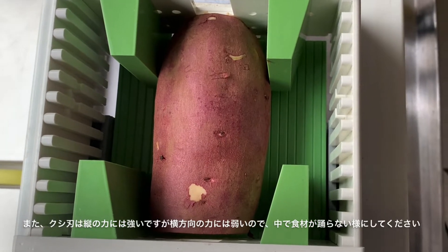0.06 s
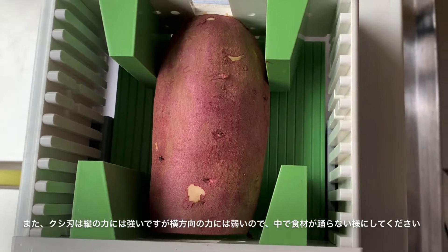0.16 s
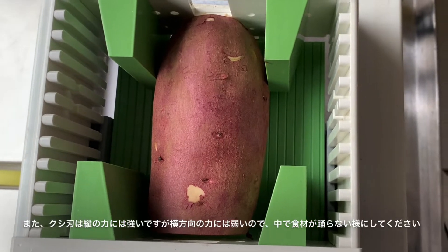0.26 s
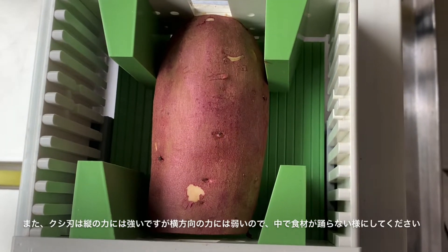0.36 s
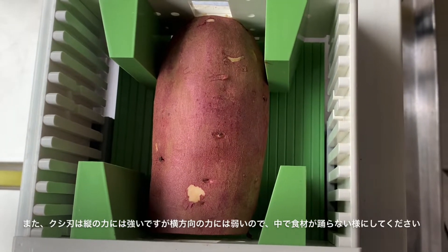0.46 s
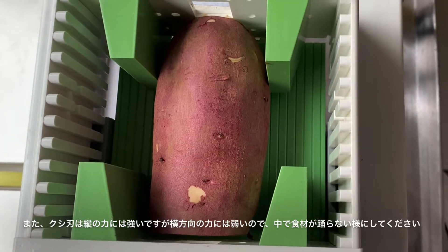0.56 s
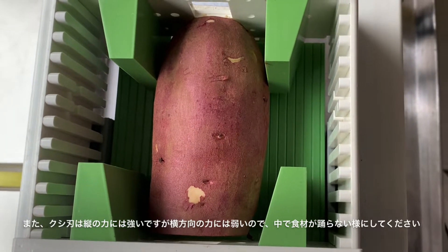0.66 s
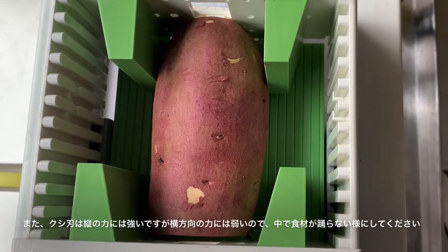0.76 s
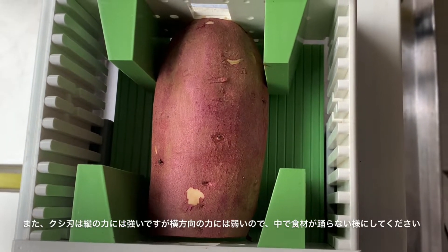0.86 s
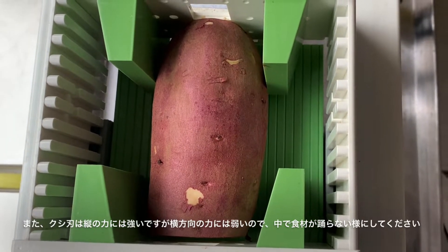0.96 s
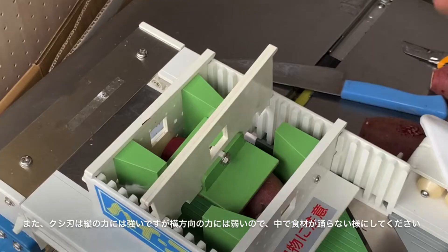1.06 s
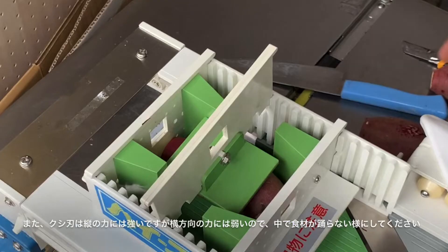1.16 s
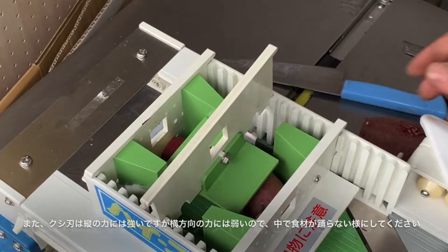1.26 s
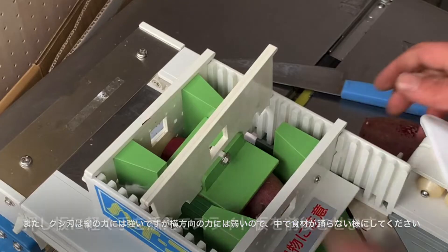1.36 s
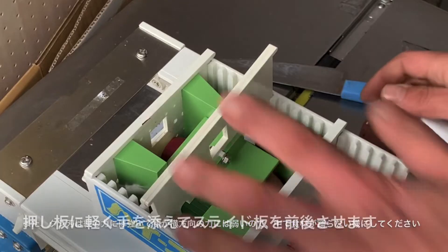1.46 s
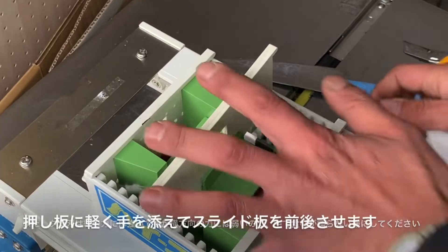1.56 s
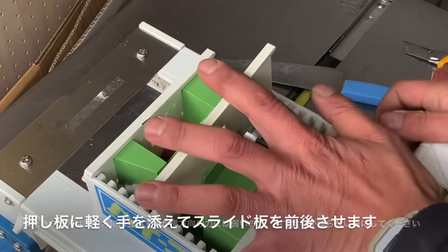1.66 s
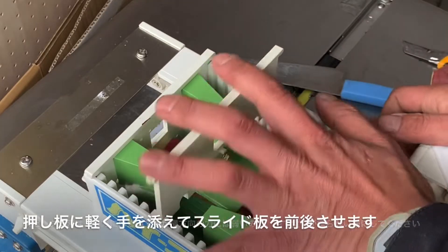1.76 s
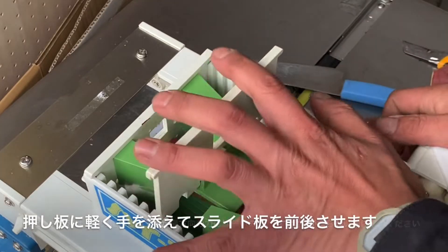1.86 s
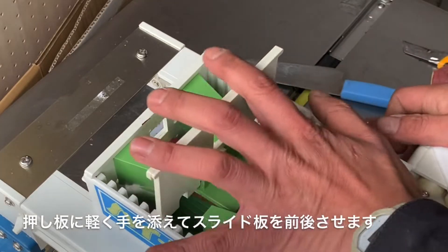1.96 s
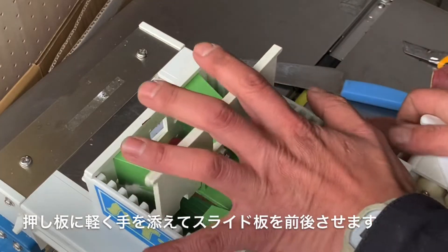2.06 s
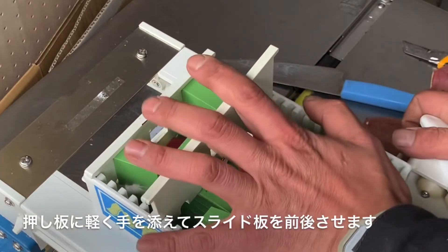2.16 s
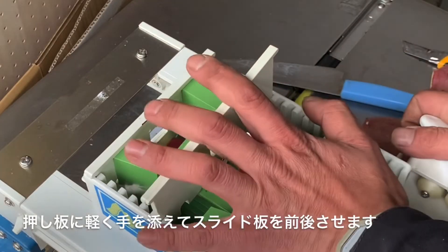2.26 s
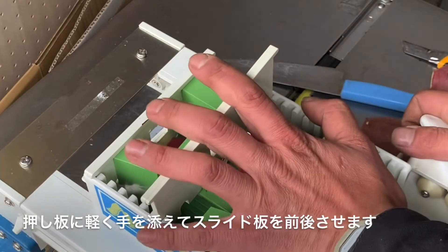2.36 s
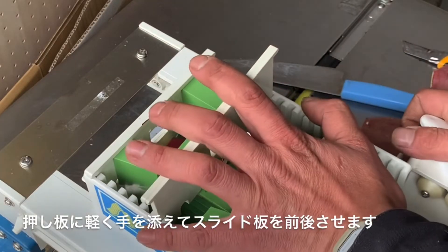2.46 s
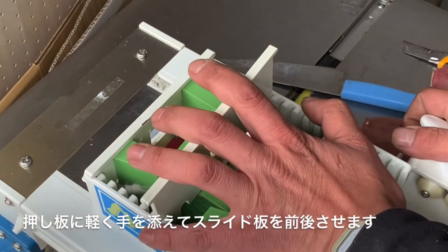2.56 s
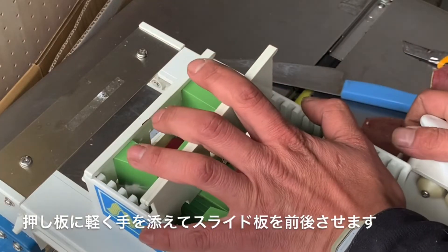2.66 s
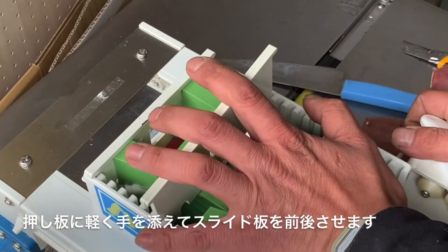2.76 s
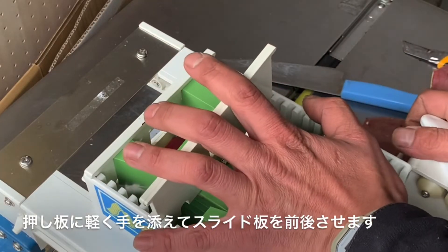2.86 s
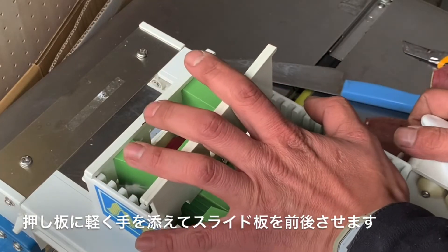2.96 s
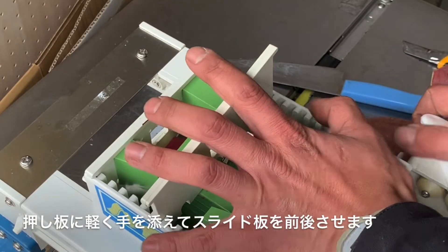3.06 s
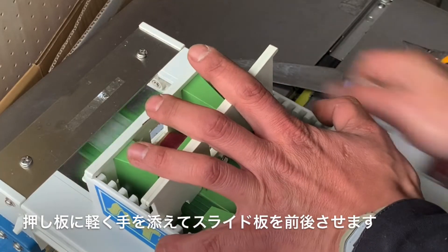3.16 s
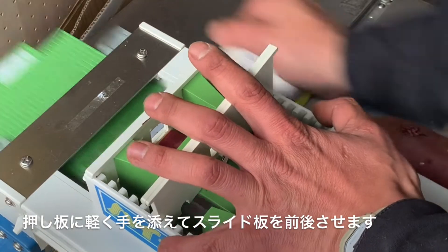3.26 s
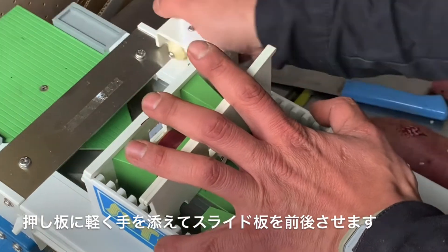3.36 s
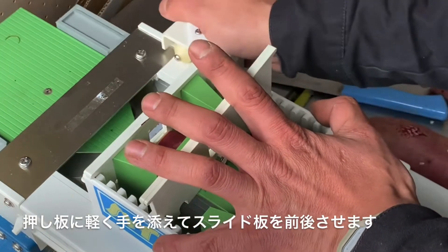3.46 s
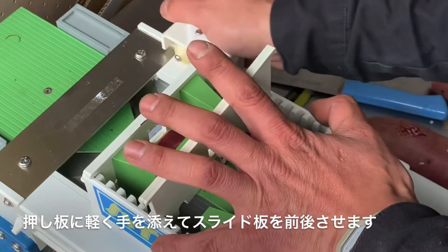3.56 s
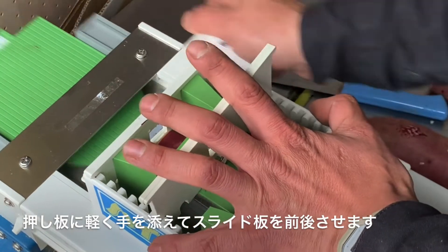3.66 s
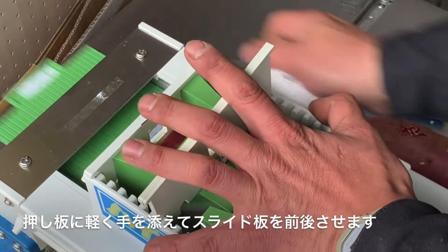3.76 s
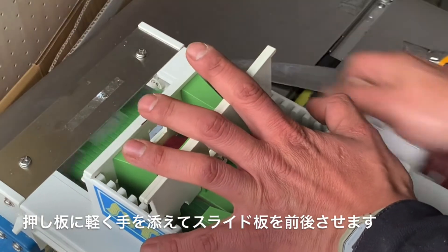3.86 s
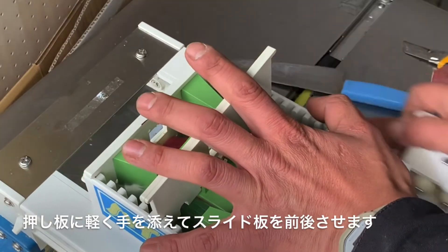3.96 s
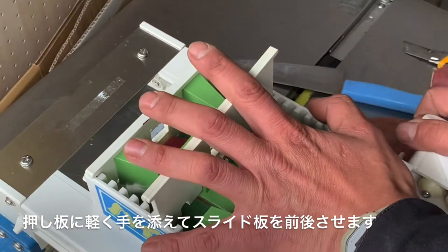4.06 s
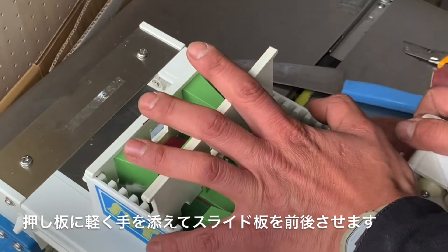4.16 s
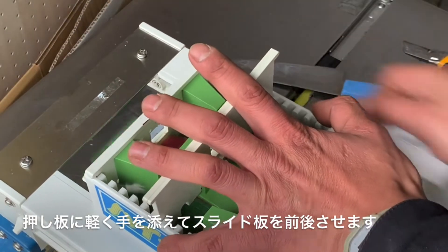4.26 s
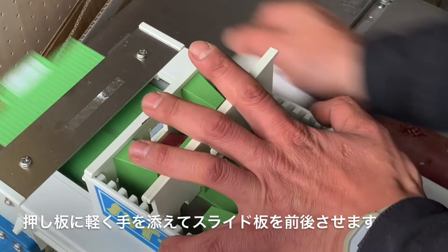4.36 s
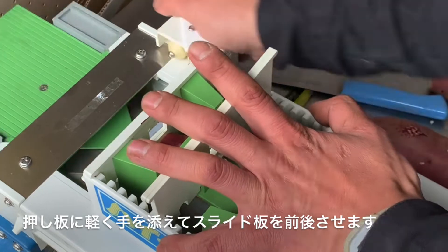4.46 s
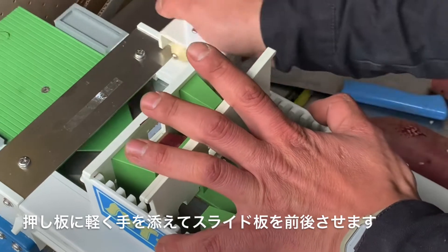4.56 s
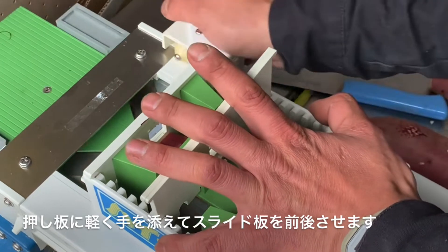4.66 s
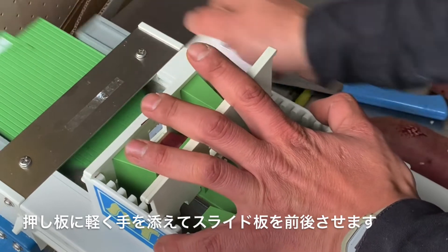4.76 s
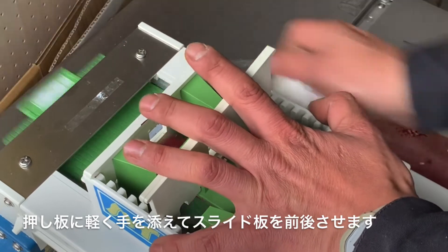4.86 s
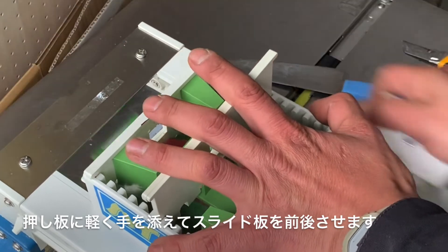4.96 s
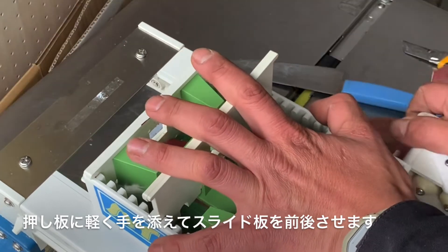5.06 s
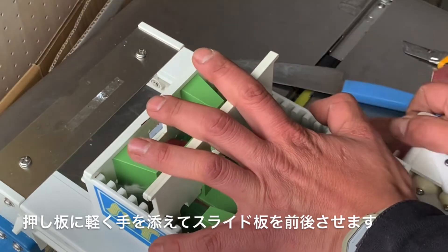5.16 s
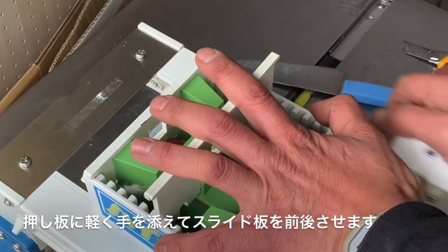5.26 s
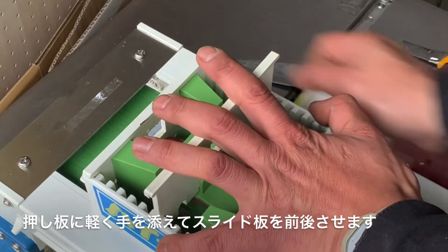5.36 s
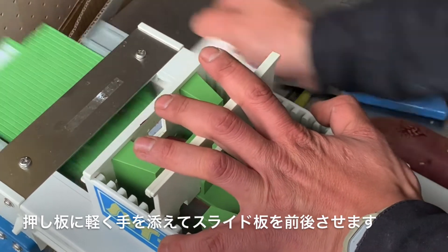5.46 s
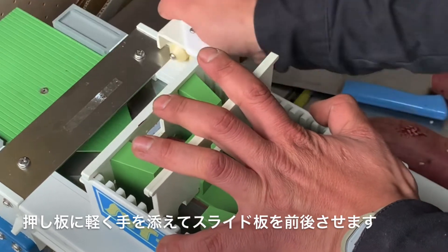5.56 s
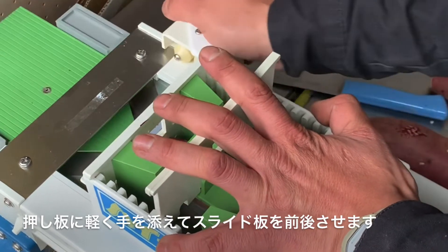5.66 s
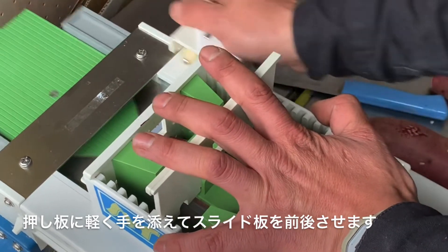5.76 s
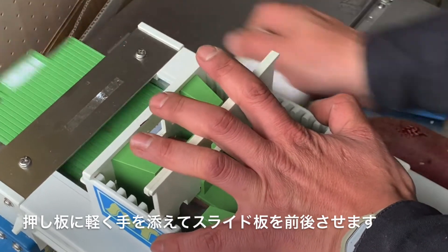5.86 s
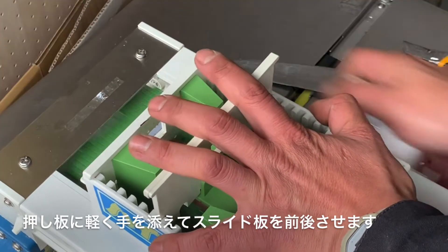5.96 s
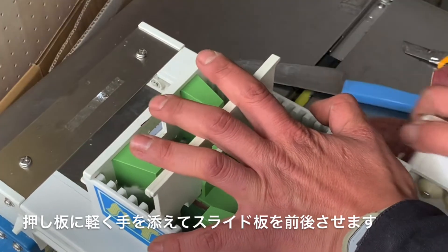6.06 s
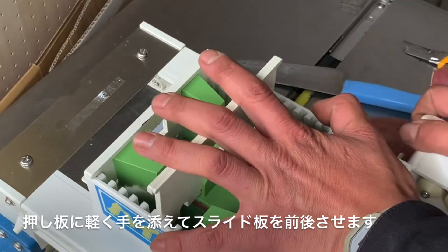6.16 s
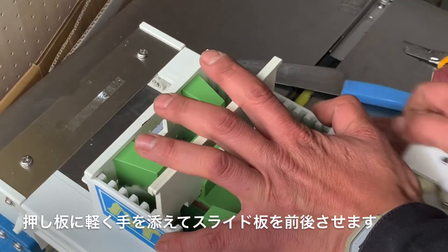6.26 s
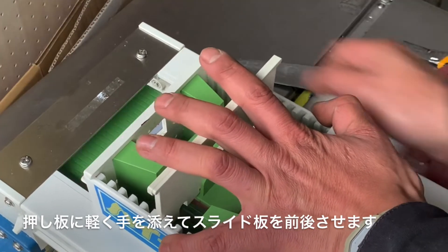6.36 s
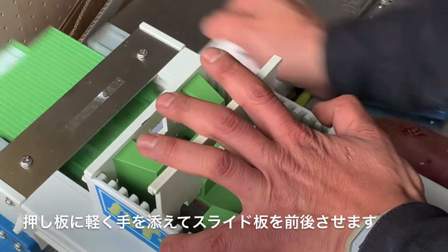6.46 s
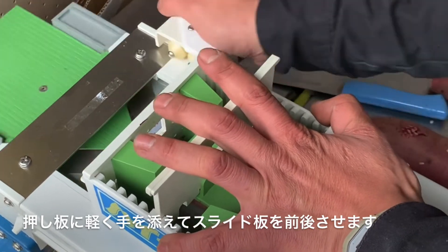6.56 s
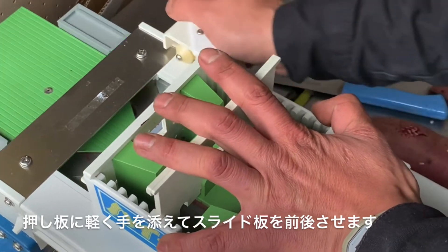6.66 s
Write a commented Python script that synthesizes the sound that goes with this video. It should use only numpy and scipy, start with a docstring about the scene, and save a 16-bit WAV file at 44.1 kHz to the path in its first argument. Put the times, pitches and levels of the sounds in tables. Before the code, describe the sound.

For the first second there is only a very quiet low fan rush with mains hum and a faint motor whine. At 1 s the level dips briefly and the fan steps up fuller; a barely audible thin tone climbs slowly. Between 1.1 and 2.1 s, soft brushing of skin and sleeve and small plastic taps mark fingers settling on a box, the clearest near 1.75-2.1 s. Little but the fan remains until two tiny dropouts just after 3 s. At about 3.1 s the first loud stroke rasps, with hard hollow clacks near 3.15 and 3.3 s. Strokes follow near 3.65, 4.2, 4.75, 5.25, 5.75 and 6.3 s, coarse and crunchy, with mid-pitched plastic rattles, brighter clicks and low counter shudder. Strong knocks land near 4.0, 4.43 and 6.5 s, as cutting continues to the end. Close, short room echo.

```python
"""A hand slicer on a kitchen counter. A fan hums, quieter in the first second, then stepping up quickly at
1 s; a faint tone climbs, and soft knocks and brushing noise tell of fingers settling on the plastic box.
From about 3 s the ribbed plate is pushed and pulled under a sweet potato: shaped noise scrapes and snaps,
low modes shake the counter, and decaying rattles knock at blade and stops. The level dips briefly at
about 1 s and twice near 3 s."""
import sys
import numpy as np
from scipy import signal
from scipy.fft import rfft, irfft, next_fast_len
from scipy.io import wavfile
from scipy.ndimage import uniform_filter1d

SR = 44100
rng = np.random.default_rng(int(sys.argv[2]) if len(sys.argv) > 2 else 0)


def int16_out(signal):
    """Quantize to a 16-bit WAV file."""
    q = np.round(np.clip(np.atleast_2d(signal).T, -1, 1) * 32767)
    wavfile.write(sys.argv[1], SR, q.astype(np.int16))


N = 296352
TIME = np.arange(N) / SR


def gain_of(db):
    """Decibels to amplitude."""
    return 10 ** (np.asarray(db) / 20)


def evened(x):
    """Scales to rms 1."""
    return x / np.sqrt(np.mean(x ** 2) + 1e-20)


def read(points, hz):
    """Reads a spectrum on a log-frequency axis."""
    point_hz, value = np.transpose(points)
    return np.interp(np.log(hz + 1), np.log(point_hz + 1), value)


def follow(rows, t):
    """Columns of a curve table at times t."""
    s, *columns = np.transpose(rows)
    return [np.interp(t, s, column) for column in columns]


def ring(x, hz, width_hz):
    """One resonance of gain near 1: a complex one-pole filter."""
    pole = np.exp((-np.pi * width_hz + 2j * np.pi * hz) / SR)
    return 2 * signal.lfilter([1 - abs(pole)], [1, -pole], x).real


def sliding(x, hz, width_hz):
    """A resonance that follows the curve hz: shift to 0 Hz, low-pass, shift back."""
    turn = np.exp(2j * np.pi * np.cumsum(hz) / SR)
    r = np.exp(-np.pi * width_hz / SR)
    return 2 * (turn * signal.lfilter([1 - r], [1, -r], x / turn)).real


def wander(width_hz):
    """Slow random curve of rms 1: noise low-passed twice."""
    return evened(ring(ring(rng.standard_normal(N), 0, width_hz), 0, width_hz))


def hiss(spectrum, size, patchy_db, tilt_db=0, bins=5):
    """Noise of a spectrum with drifting patches (rms patchy_db); tilt_db > 0 brightens, per frame."""
    hz = np.fft.rfftfreq(size, 1 / SR)
    frames = N * 4 // size + 5
    real, imag, patches = rng.standard_normal((frames, len(hz), 3)).T
    patches = uniform_filter1d(patches, size=20, axis=1)
    patches = evened(uniform_filter1d(patches, size=bins, axis=0))
    frame_tilt_db = np.interp(np.arange(frames) * size / 4, np.arange(N), tilt_db * np.ones(N))
    lean_db = frame_tilt_db * np.log2(hz / 2000 + 2.8)[:, None]
    level_db = read(spectrum, hz)[:, None] + patchy_db * patches + lean_db
    z = (real + 1j * imag) * gain_of(level_db)
    return signal.istft(z, nperseg=size, noverlap=size * 3 // 4)[1][:N]


def catches(per_s, spread_db, decay_s):
    """Uneven grip: random catches, each a sudden jump in force that dies away."""
    happens = rng.random(N) < per_s / SR
    jumps = gain_of(spread_db * np.minimum(rng.exponential(1, N), 4)) * happens
    return evened(signal.lfilter([1], [1, -np.exp(-1 / (decay_s * SR))], jumps))


# fan rush spectrum: [hz, level_db_per_hz]
AIR_SPECTRUM = [(25, -13), (55, 8), (82, -3.5), (125, -7.5), (155, -11.5), (210, -12), (300, -11),
                (600, -24.5), (1000, -31.5), (7300, -55.5), (16000, -56)]
# fan over time: [time_s, rush_db, motor_hz, whine_db]
FAN_CURVE = [(0, -61, 134, -68.5), (1.0, -63.5, 134.1, -70.5), (1.1, -55, 131.9, -67), (1.5, -54, 132, -60),
             (3.0, -52, 130.8, -63.5)]
# mains hum: [hz, peak_db re rush rms]
HUM_TONES = [(100, -3.5), (200, -12)]
# motor harmonics 1-5: [level_db re whine]
WHINE_HARMONICS_DB = [-4.5, -10.5, -1, -20, -26.5]
# faint climbing tone: [time_s, pitch_hz, level_db]
RISER_CURVE = [(1.2, 532, -97), (1.4, 547, -80), (2.45, 580, -72.5), (3.0, 591.6, -72.5)]


def fan():
    """Low rush with mains hum, and apart from it the motor's whine and a climbing tone."""
    rush_db, motor_hz, whine_db = follow(FAN_CURVE, TIME)
    waver_db = evened(ring(rng.standard_normal(N), 0, 24.0))
    motor_phase = 2 * np.pi * np.cumsum(motor_hz) / SR
    harmonics = sum(gain_of(db) * np.sin(k * motor_phase)
                    for k, db in enumerate(WHINE_HARMONICS_DB, 1))
    whine = gain_of(whine_db + 0.42 * waver_db) * harmonics
    riser_hz, riser_db = follow(RISER_CURVE, TIME)
    riser = gain_of(riser_db) * np.sin(2 * np.pi * np.cumsum(riser_hz) / SR)
    hum = sum(gain_of(db) * gain_of(waver_db) * np.sin(2 * np.pi * hz * TIME) for hz, db in HUM_TONES)
    air = evened(hiss(AIR_SPECTRUM, size=2048, patchy_db=2.5))
    return gain_of(rush_db) * (air + hum), np.sqrt(2) * (whine + riser)  # tone tables are rms


# blows on the box: [start_s, level_db, spot_hz, crack_db (relative), t60_s]
BLOWS = [(0.929, -60.5, 940, -32, 0.034), (1.63, -55, 186, -40, 0.24), (1.742, -40, 1550, -27, 0.052),
         (1.756, -45, 328, -30, 0.12), (1.798, -36.5, 3290, -19, 0.06), (2.02, -49.5, 1500, -10, 0.14),
         (2.091, -38.5, 3570, -26, 0.047), (2.108, -33.5, 984, -32, 0.057), (2.459, -53, 1070, -20, 0.15),
         (2.772, -60, 1750, -20, 0.064), (2.901, -47, 3870, -20, 0.16), (2.998, -32, 2030, -2, 0.064),
         (3.039, -37.5, 1060, -26, 0.14), (3.147, -12, 1452, -3.5, 0.084), (3.312, -13, 1910, -6.5, 0.082),
         (3.315, -8.5, 1083, -29, 0.057), (3.325, -27.5, 191, -40, 0.35), (3.444, -34.5, 2960, -4, 0.065),
         (3.547, -25, 1050, -39, 0.072), (3.67, -25, 4360, -2, 0.093), (3.928, -30.5, 4960, -4, 0.07),
         (3.959, -24.5, 4263, 1, 0.13), (3.974, -10, 1630, -7, 0.05), (4.166, -37, 1080, -2.5, 0.18),
         (4.243, -26.5, 1050, 5.5, 0.053), (4.257, -22, 934, 5, 0.1), (4.424, -14.5, 1480, -4, 0.079),
         (4.428, -8, 1134, -29, 0.048), (4.436, -18.5, 212, -40, 0.18), (4.467, -17, 2070, -7, 0.047),
         (4.762, -24, 7350, 2, 0.037), (4.85, -20.5, 706, 2.5, 0.12), (4.996, -31, 3300, -2, 0.16),
         (5.178, -40.5, 1005, -17, 0.47), (5.221, -17, 1800, -9, 0.064), (5.27, -13, 1510, -5.5, 0.031),
         (5.293, -27.5, 4300, 1, 0.1), (5.384, -22.5, 780, -8, 0.11), (5.476, -22, 1470, -20, 0.11),
         (5.506, -18.5, 1480, 0.5, 0.054), (5.593, -16, 1806, -12, 0.057), (5.659, -30.5, 630, -32, 0.045),
         (5.803, -24, 7050, 2.5, 0.055), (5.9, -22.5, 860, 4, 0.077), (5.956, -24.5, 3800, -21, 0.096),
         (6.017, -23, 5030, 0, 0.026), (6.062, -30, 1000, 4, 0.068), (6.287, -18, 1310, 0.5, 0.083),
         (6.392, -22, 840, 1, 0.17), (6.482, -17.5, 1450, -6, 0.032), (6.511, -13.5, 2550, -3, 0.058),
         (6.519, -8.5, 1255, -16, 0.052), (6.589, -23, 1620, -27, 0.054), (6.636, -24, 1385, -10, 0.085)]
# plastic box modes, width and level rescaled by each user: [pitch_hz, width_hz, level_db]
BOX_MODES = [(841, 47, -15.5), (1026, 230, -7), (1388, 134, -15.5), (1686, 89, -11.5), (1893, 750, -3.5),
             (2610, 840, -4), (3413, 124, -7), (8480, 370, -18.5)]
# counter modes: [pitch_hz, width_hz, level_db (shake only)]
COUNTER_MODES = [(85.6, 53, 4.5), (190.2, 28, 5), (215, 13, 1), (243.2, 21.3, -3), (329.7, 56, 3.5),
                 (541, 35, -1.5)]
SPOT_DB, SPOT_RING = -4.5, .55  # clean ring: level in the blow, share of the blow's t60


def knocks():
    """Short rattles: the struck spot rings clean, box modes near it buzz, it cracks, thumps the counter."""
    size = 8192
    out, t = np.zeros(N + size), np.arange(size) / SR
    soft_onset = 1 - np.exp(-t / 0.0012)
    draws = rng.standard_normal((len(BLOWS), 3, size))
    for (start_s, level_db, spot_hz, crack_db, t60_s), (noise, grit, loose) in zip(BLOWS, draws):
        decay = gain_of(-60 * t / t60_s)
        rattle = gain_of(1.8 * evened(uniform_filter1d(loose, size=100)))
        force = (1 - np.exp(-t / 0.001)) * decay * rattle
        # box modes far from the struck spot sound less
        modes = [(spot_hz, 300, 0)]
        modes += [(hz, w, .5 * db - 2.6 * abs(np.log2(hz / spot_hz))) for hz, w, db in BOX_MODES]
        body = sum(gain_of(db) * ring(ring(noise * force, hz, w), hz, 4 * w) / np.sqrt(w)
                   for hz, w, db in modes)
        crack = ring(ring(grit, 3880, 10400), 3800, 10400) * soft_onset * decay * rattle
        thump = sum(evened(ring(ring(noise * decay, hz, w), hz, 2 * w))
                    for hz, w, _ in COUNTER_MODES[1:-1])
        loudness = np.sqrt(0.2 * t60_s)  # sets the body's rms by its decay time
        spot_decay = gain_of(SPOT_DB - 60 * t / (SPOT_RING * t60_s))
        spot = spot_decay * soft_onset * np.sin(2 * np.pi * spot_hz * t)
        blow = spot + 0.83 * loudness * evened(body) + gain_of(crack_db) * crack / 3
        thump_db = 0.6 * level_db - 38.5  # soft touches thump more in proportion
        out[round(start_s * SR):][:size] += gain_of(level_db) * blow + gain_of(thump_db) * evened(thump)
    return out[:N]


# skin and sleeve brushing the box: [peak_s, level_db, rise_s, fall_s]
FINGER_SWELLS = [(1.07, -72.5, 0.05, 0.043), (1.18, -64, 0.027, 0.042), (1.303, -60.5, 0.028, 0.021),
                 (1.521, -56.5, 0.094, 0.091), (1.712, -61, 0.014, 0.04), (1.817, -50, 0.025, 0.042),
                 (1.97, -66.5, 0.045, 0.25), (2.25, -79, 0.042, 0.33)]
# brushing spectrum: [hz, level_db_per_hz]
BRUSH_SPECTRUM = [(530, -0.5), (900, -6), (3000, 2.5), (6500, -7.5), (12500, -11.5), (15000, -37)]


def fingers():
    """Skin and sleeve brush the box: soft smooth noise in bell-shaped swells."""
    level = 0
    for peak_s, level_db, rise_s, fall_s in FINGER_SWELLS:
        side_s = np.where(TIME < peak_s, rise_s, fall_s)
        level = level + gain_of(level_db) * np.exp(-((TIME - peak_s) / side_s) ** 2)
    return level * evened(hiss(BRUSH_SPECTRUM, size=256, patchy_db=1.5))


# pushes and pulls in turn: [start_s, end_s, turn_db (before the stroke), scrape_early_db, scrape_late_db,
# shake_early_db, shake_late_db, boost_s, boost_db, swell_s, swell_db]; the last four are a short scrape
# boost and a sway swell, centred at times from the start of the sound, not tied to the row's stroke
STROKE_ROWS = [(3.121, 3.359, -57, -30, -38, -32.5, -36, 3.25, 2, 3.17, 4),
               (3.64, 4, -55, -39.5, -38, -39.5, -39, 3.48, 9.5, 3.85, 10),
               (4.225, 4.43, -62, -30.5, -33, -32, -32, 3.1, 3, 4.6, 8),
               (4.742, 5.031, -54, -33.5, -45, -31, -41.5, 4.95, 2.5, 4.25, 7.5),
               (5.246, 5.513, -59.5, -32.5, -37.5, -35, -29.5, 5.48, 0.5, 3.9, 6),
               (5.763, 6.082, -55, -43, -36, -38, -34.5, 5.9, 10, 5.96, 6.5),
               (6.286, 6.532, -52.5, -37.5, -36.5, -31.5, -31, 6.31, 11, 6.4, 4.5)]
# end of a push, of a pull: [slowing_s, drop_db]
SLOWING_ROWS = [(0.06, -12.5), (0.019, -12)]
CREEP_S, SET_OFF_DB, RISE_S = 0.099, -48.5, 0.027  # creep after the turn, set-off level, time to speed
BOOST_S, SWELL_S = 0.036, 0.11  # half widths of scrape boost and sway swell
SWAY_DB = -6.5  # sway re shake


def strokes():
    """Scrape, shake, sway in dB: turn, creep, rise, drift, slowing; scrape boosts and sway swells added."""
    points, boosts_db, swells_db = [], 0, 0
    for row, (slowing_s, drop_db) in zip(STROKE_ROWS, SLOWING_ROWS * len(STROKE_ROWS)):
        start_s, end_s, turn_db, scrape_early_db, scrape_late_db, shake_early_db, shake_late_db = row[:7]
        boost_s, boost_db, swell_s, swell_db = row[7:]
        points += [(start_s - CREEP_S, turn_db, turn_db),
                   (start_s, SET_OFF_DB, SET_OFF_DB),
                   (start_s + RISE_S, scrape_early_db, shake_early_db),
                   (end_s, scrape_late_db, shake_late_db),
                   (end_s + slowing_s, scrape_late_db + drop_db, shake_late_db + drop_db)]
        boosts_db = boosts_db + boost_db * np.exp(-((TIME - boost_s) / BOOST_S) ** 2)
        swells_db = swells_db + swell_db * np.exp(-((TIME - swell_s) / SWELL_S) ** 2)
    silence = [(0, -150, -150), (points[0][0] - RISE_S, -150, -150)]
    scrape_db, shake_db = follow(silence + points, TIME)
    return scrape_db + boosts_db, shake_db, shake_db + SWAY_DB + swells_db


# rib scrape spectrum: [hz, level_db_per_hz]
SCRAPE_SPECTRUM = [(200, -42), (400, 2), (1300, -2.5), (2430, -1.5), (3810, -3.5), (9470, -21),
                   (14100, -24.5), (16000, -99)]


def rub(scrape_db):
    """Ribs drag under the potato and along the rails: patchy noise, brighter when harder, uneven in grip."""
    tilt_db = np.clip(0.038 * (scrape_db + 32.0), -4, 2)
    grip = .8 + .4 * catches(per_s=300, spread_db=3.5, decay_s=.003)
    # narrow patches: resonances come and go
    return evened(hiss(SCRAPE_SPECTRUM, size=512, patchy_db=4, tilt_db=tilt_db, bins=2) * grip)


def crunch():
    """Fibres snap at the blade: noise catches drive box modes whose pitch wanders slowly at random."""
    snaps = [catches(per_s=130, spread_db=3.5, decay_s=.003) * rng.standard_normal(N) for _ in BOX_MODES]
    shift = wander(12)
    total = 0
    for k, (snap, (hz, width_hz, db)) in enumerate(zip(snaps, BOX_MODES)):
        mode_hz = hz * (1 + .07 * (-1) ** k * shift)  # neighbours shift opposite ways
        total = total + gain_of(db / 2) * evened(sliding(snap, mode_hz, .7 * width_hz))
    return evened(total)


def counter_shake():
    """Uneven noise force rings the counter's modes."""
    push = rng.standard_normal(N) * (.5 + .6 * catches(per_s=50, spread_db=3.5, decay_s=.012))
    return evened(sum(gain_of(db) * evened(ring(ring(push, hz, w), hz, 3 * w))
                      for hz, w, db in COUNTER_MODES))


def counter_sway():
    """The counter's lowest mode: a sine near 76.1 Hz that wanders in level and pitch."""
    level = gain_of(2.5 * wander(25))
    sway_hz = 76.1 * (1 + .12 * wander(15))
    return evened(level * np.sin(2 * np.pi * np.cumsum(sway_hz) / SR))


def plate():
    """The sliding plate: rub and crunch at the scrape level, over the counter's shake and sway."""
    scrape_db, shake_db, sway_db = strokes()
    cutting = gain_of(np.clip(scrape_db + 45, -8, 0))  # weaker snaps while the plate rests
    scrape = evened(rub(scrape_db) + .8 * cutting * crunch())
    return gain_of(scrape_db) * scrape + gain_of(shake_db) * counter_shake() + gain_of(sway_db) * counter_sway()


# kitchen echo: [hz, t60_s]
ROOM_T60 = [(200, 0.16), (4000, 0.39), (12000, 0.1)]


def room(x):
    """Two tails of sparse taps of random sign, each band dying at its own speed."""
    taps = np.zeros((2, SR // 2))
    at = np.arange(300, SR // 2 - 20, 20)
    at = at + rng.integers(0, 20, (2, len(at)))
    np.put_along_axis(taps, at, rng.choice([-1., 1.], at.shape), 1)
    hz, t, z = signal.stft(taps, SR, nperseg=128)
    decay = gain_of(-60 * t / read(ROOM_T60, hz)[:, None])
    tail = signal.istft(z * decay, SR, nperseg=128)[1]
    return signal.fftconvolve(x[None], tail / np.linalg.norm(tail[0]), axes=1)[:, :N]


def scattered(x):
    """A copy whose phase drifts at random, used to make left and right differ."""
    z = signal.stft(x, nperseg=512)[2]
    a, b = uniform_filter1d(rng.standard_normal((2,) + z.shape), size=3, axis=1)
    shifted = z * np.exp(1j * np.arctan2(a, b))
    return np.sqrt(2) * signal.istft(shifted, nperseg=512)[1][:N]


def scene():
    """The slicer with the kitchen's echo, over the fan; first row direct, second row scattered."""
    slicer = plate() + knocks() + fingers()
    rush, tones = fan()
    rows = np.array([slicer + rush + tones, scattered(slicer + rush)])
    return rows + gain_of(-15.0) * room(slicer)


# left-right likeness: [hz, likeness_0_to_1]
LIKENESS = [(200, .98), (1000, .84), (3000, .7), (6000, .6), (9000, .9), (15000, .75)]
# left channel's phase: [hz, phase_rad]
LEFT_PHASE = [(300, 0), (1500, -.6), (2900, -2.6), (5000, -4.8)]
# brief level dips: [start_s, end_s, depth_db, edge_s]
DIPS = [(1, 1.006, -16, 0.012), (3.017, 3.035, -39, 0.00069), (3.061, 3.088, -30.5, 0.00084)]
BAND_LIMIT_HZ = 15650


def record(dry):
    """Stereo: left lags up to about 6.8 kHz, above it the channels nearly merge; bass cut, dips, band limit."""
    size = next_fast_len(N + SR)
    hz = np.fft.rfftfreq(size, 1 / SR)
    same = np.clip(read(LIKENESS, hz), 0, 1)
    shares = np.array([np.sqrt((1 + same) / 2), np.sqrt((1 - same) / 2)])
    bass_cut = 1 / np.sqrt(1 + (42 / (hz + 1)) ** 6)
    direct, scatter = rfft(dry, size) * shares * bass_cut
    lag = np.exp(1j * read(LEFT_PHASE + [(6800, -2 * np.pi)], hz))  # a full turn from 6.8 kHz up
    left_tone = gain_of(read([(1500, -0.5), (5000, 3.5), (8000, 1.0)], hz))
    pair = irfft([(direct + scatter) * lag * left_tone, direct - scatter], size)[:, :N]
    for start_s, end_s, depth_db, edge_s in DIPS:
        corners_s = [start_s - edge_s, start_s, end_s, end_s + edge_s]
        pair = pair * gain_of(np.interp(TIME, corners_s, [0, depth_db, depth_db, 0]))
    low_pass = signal.firwin(511, BAND_LIMIT_HZ, window=("kaiser", 9), fs=SR)
    return signal.oaconvolve(pair, low_pass[None], "same")


dry = scene()
out = record(dry)
int16_out(out)
```